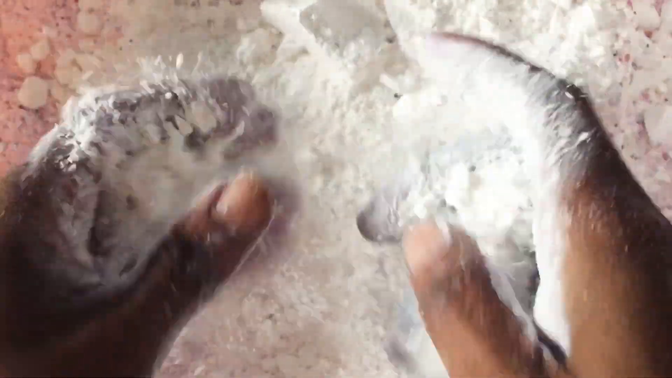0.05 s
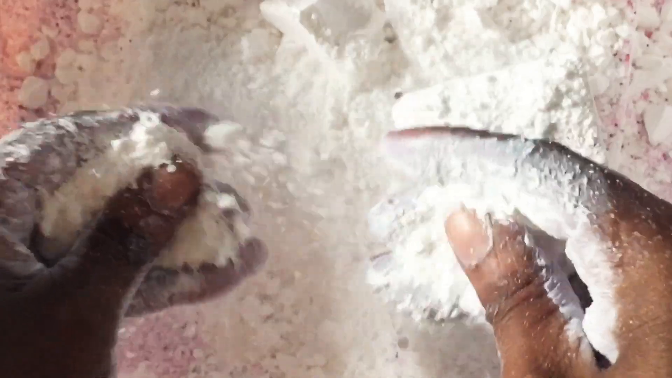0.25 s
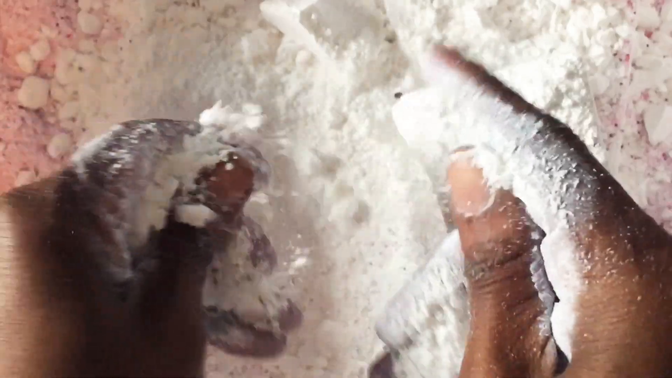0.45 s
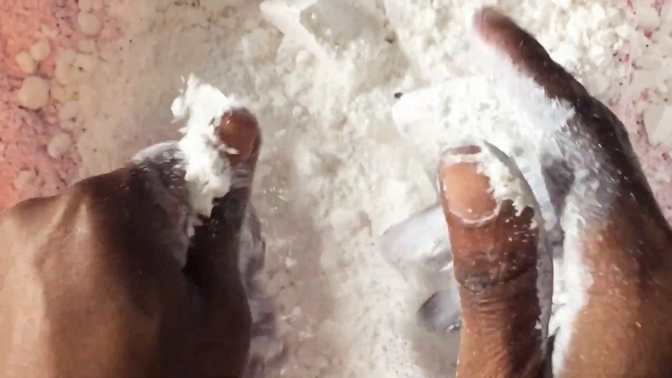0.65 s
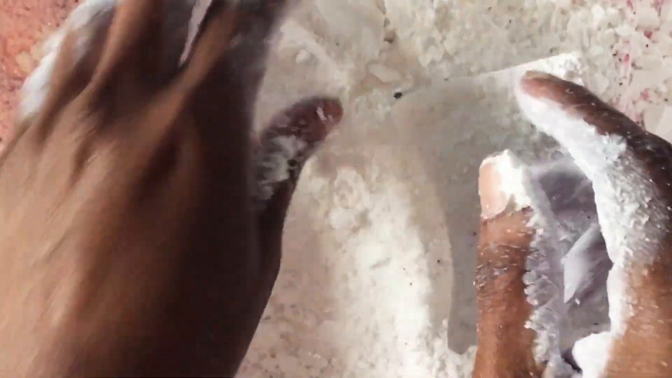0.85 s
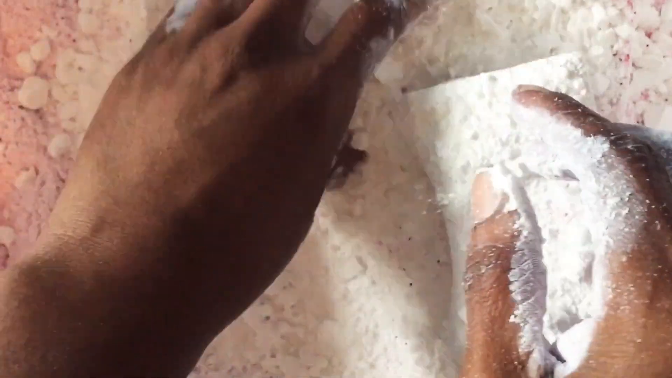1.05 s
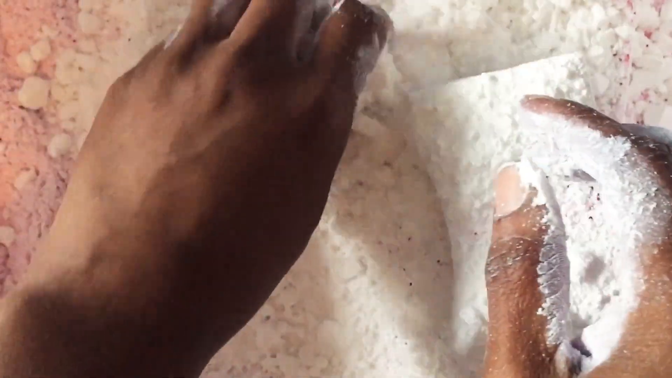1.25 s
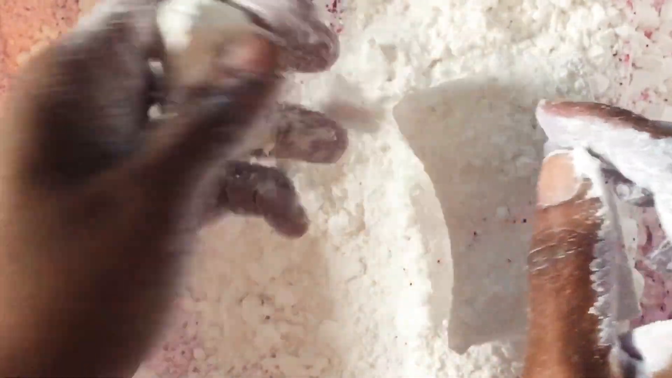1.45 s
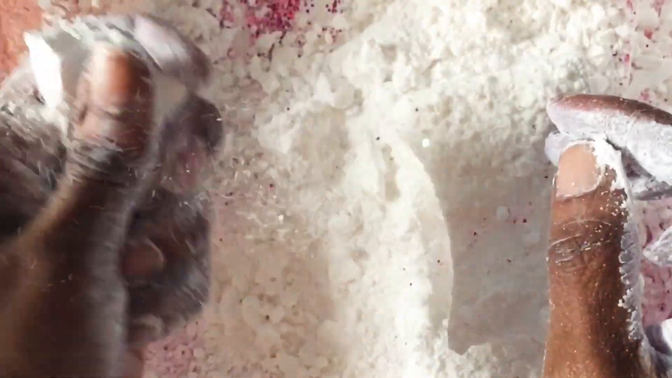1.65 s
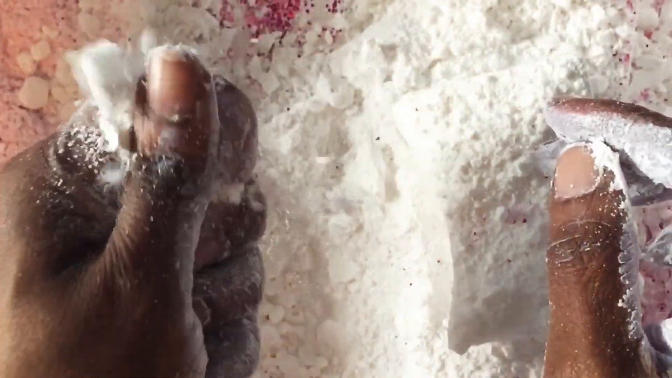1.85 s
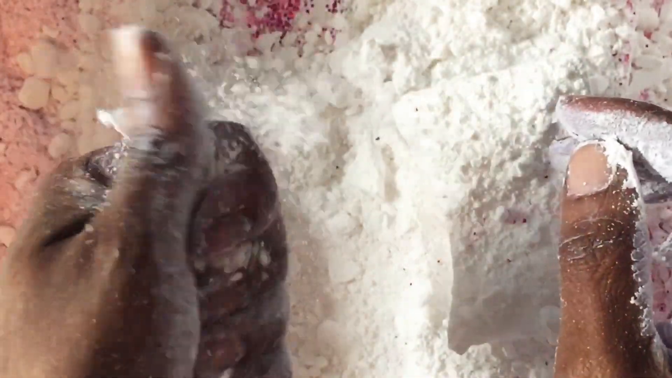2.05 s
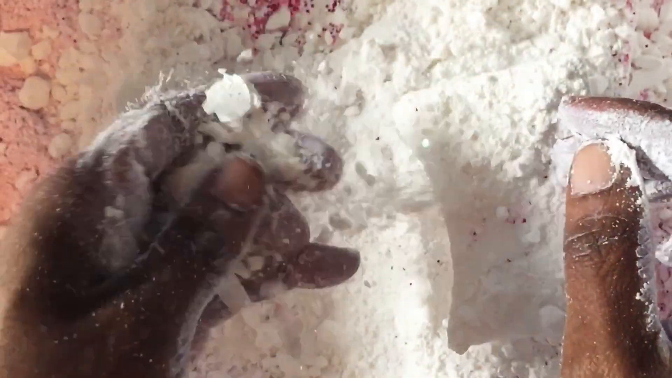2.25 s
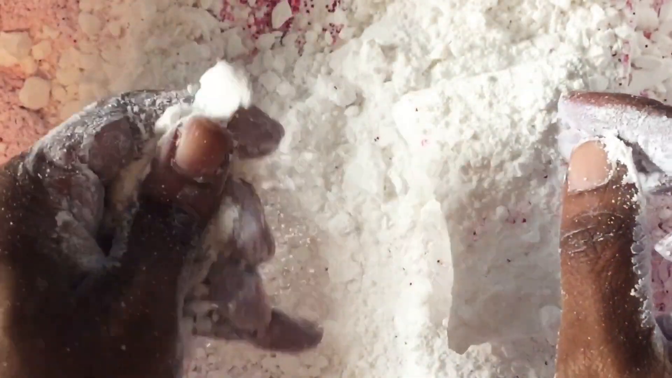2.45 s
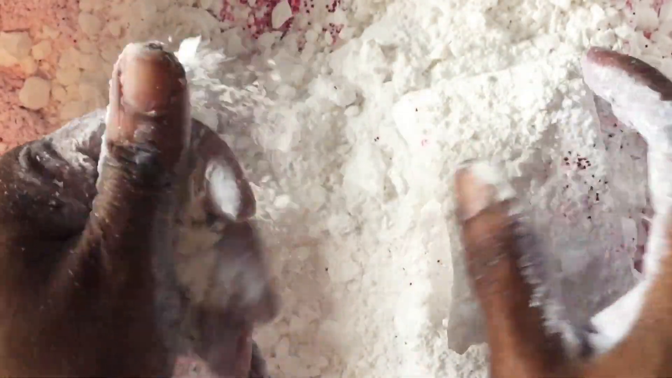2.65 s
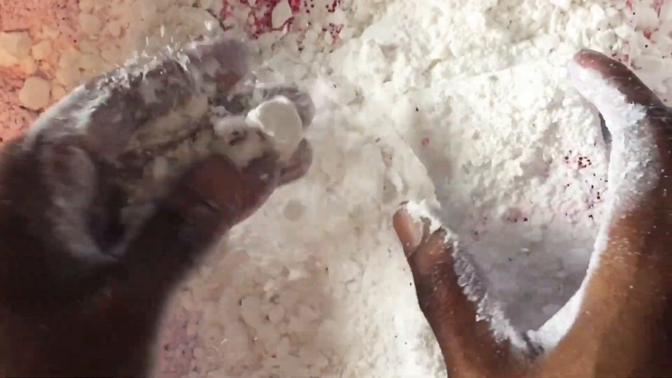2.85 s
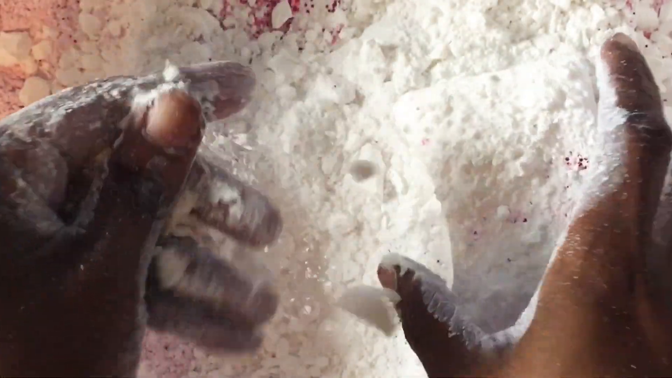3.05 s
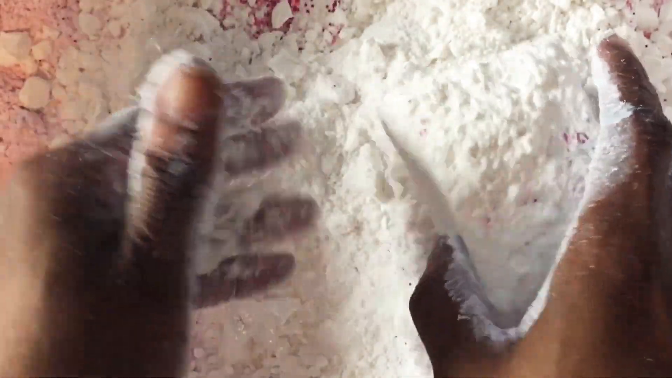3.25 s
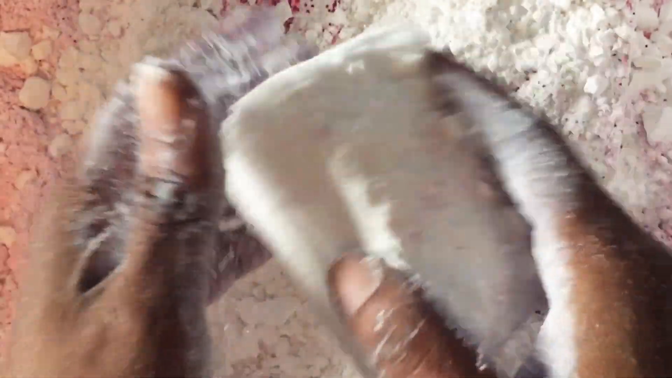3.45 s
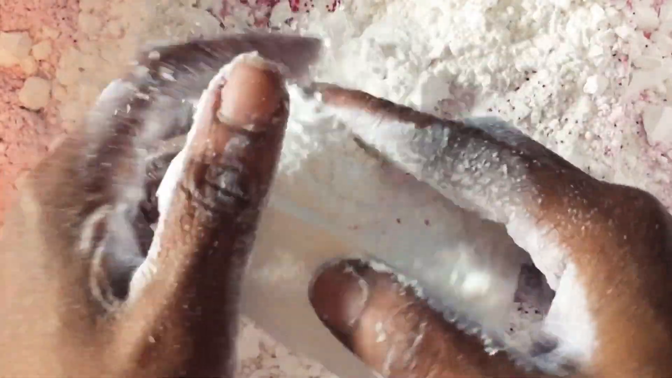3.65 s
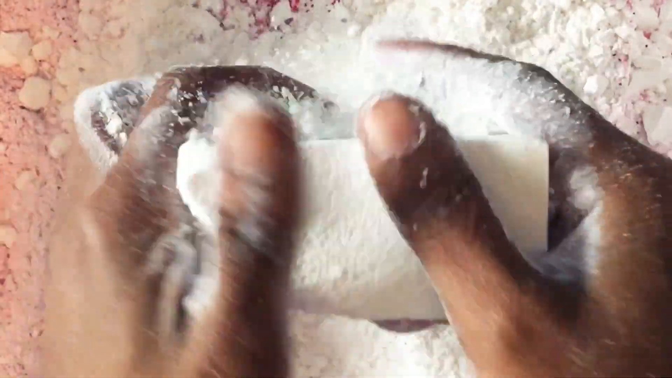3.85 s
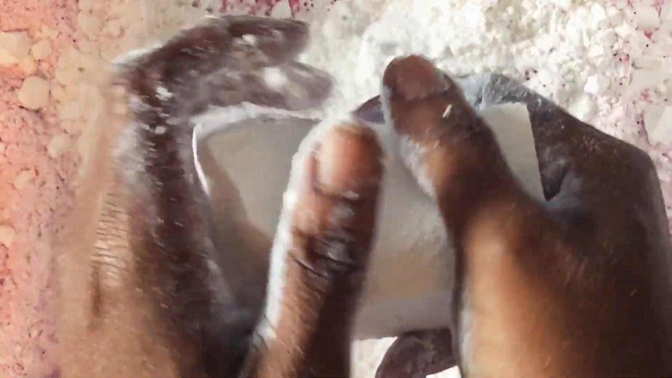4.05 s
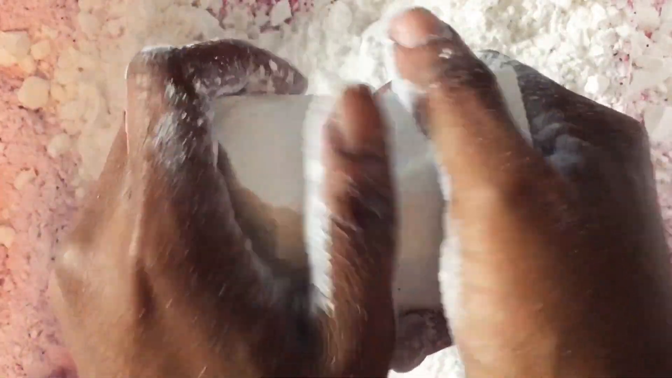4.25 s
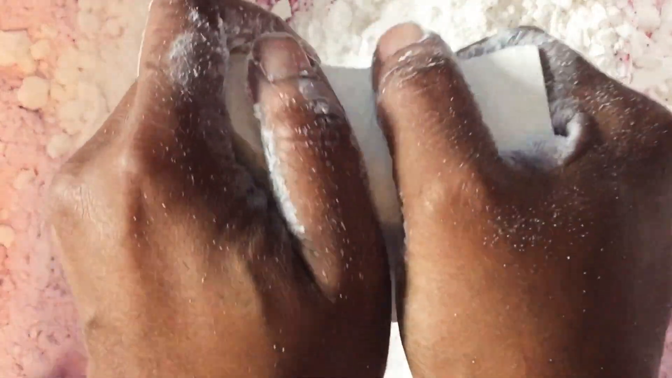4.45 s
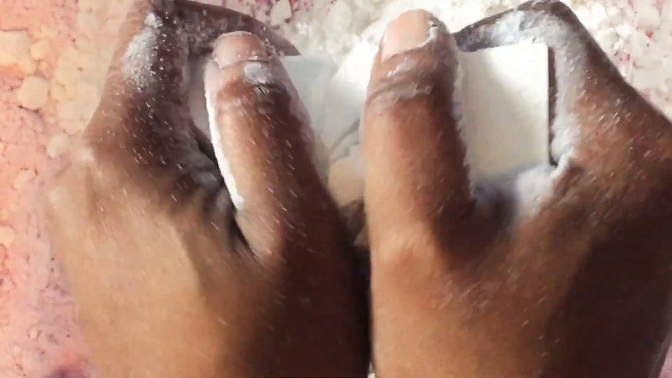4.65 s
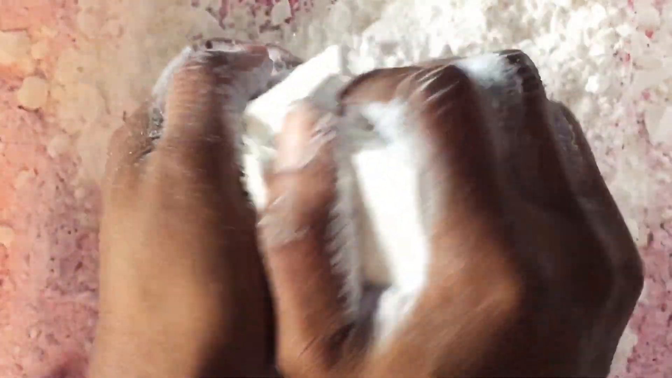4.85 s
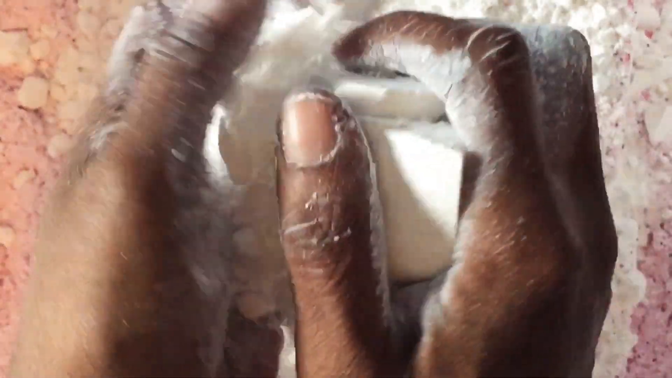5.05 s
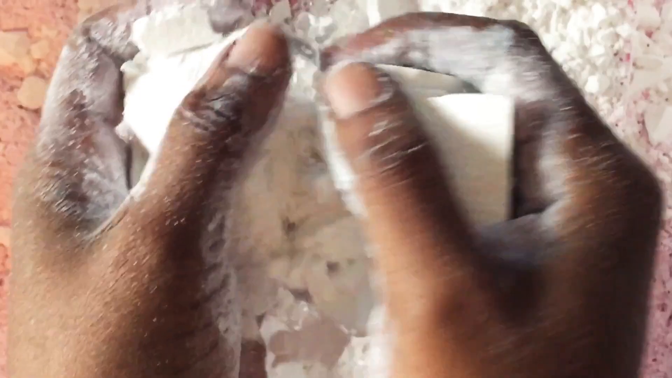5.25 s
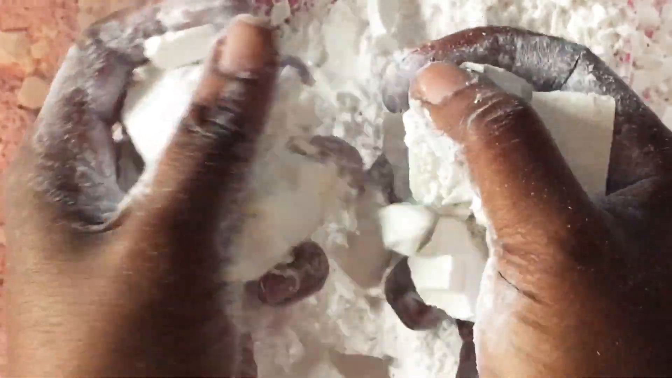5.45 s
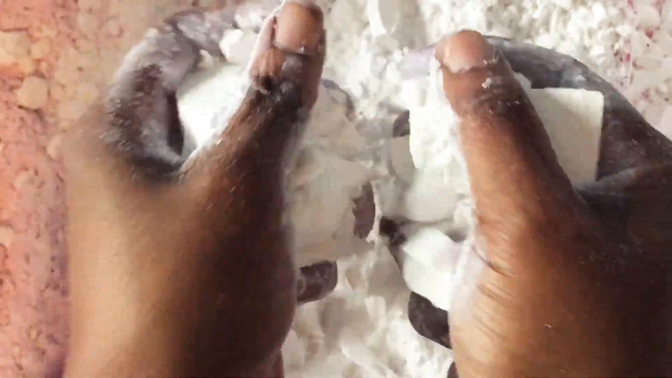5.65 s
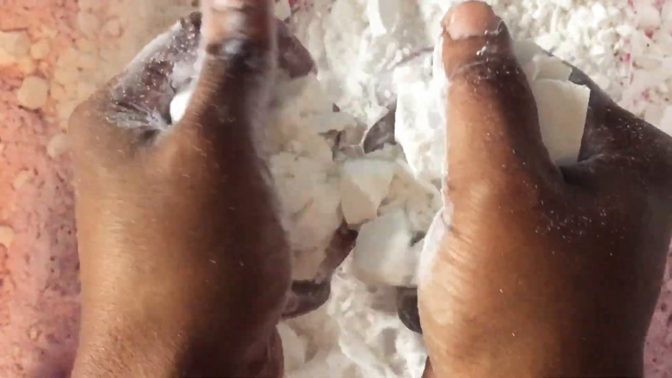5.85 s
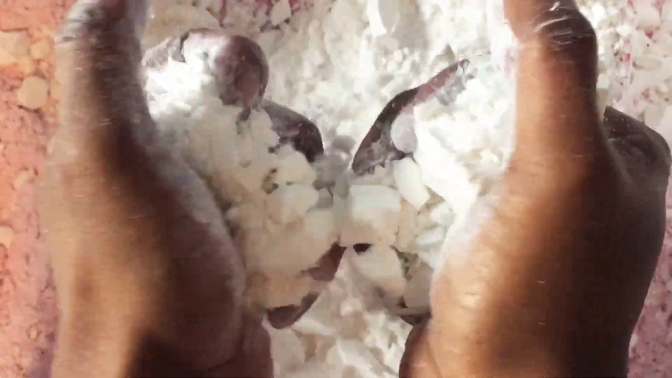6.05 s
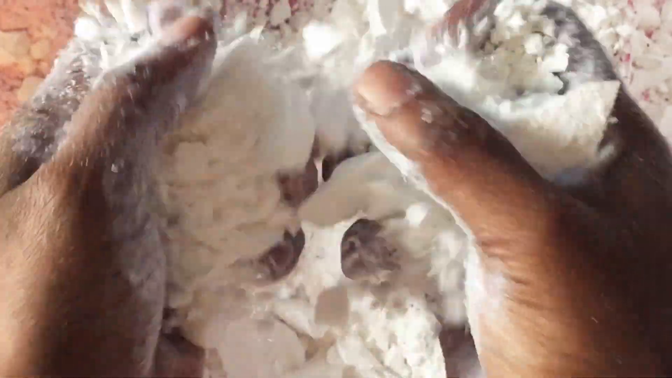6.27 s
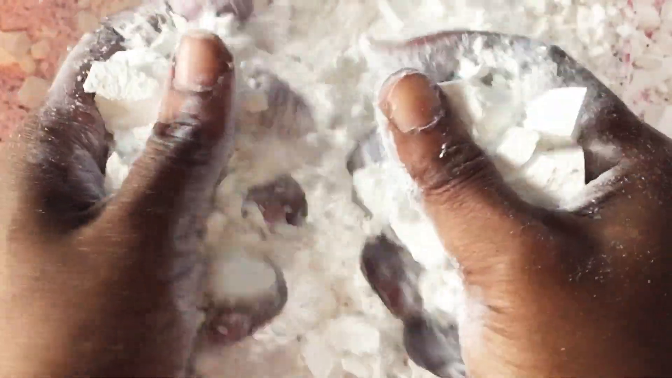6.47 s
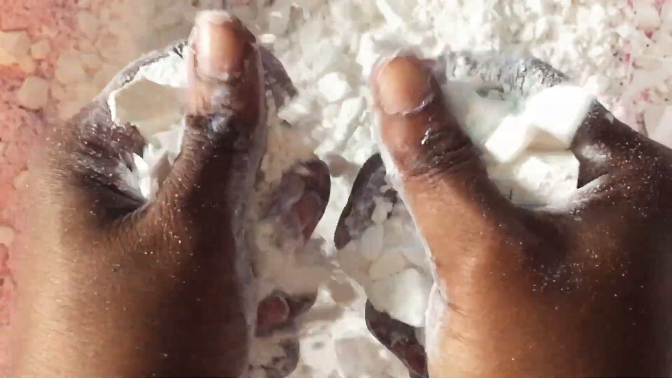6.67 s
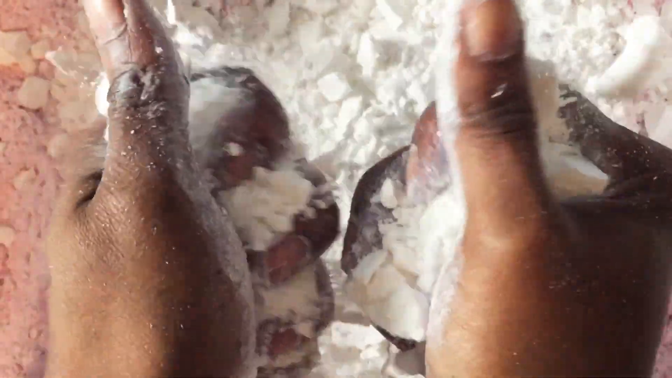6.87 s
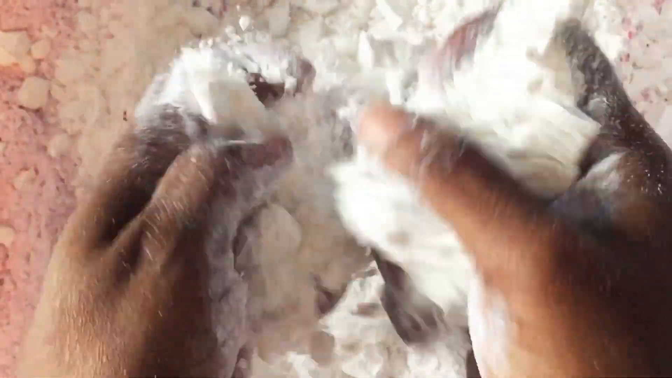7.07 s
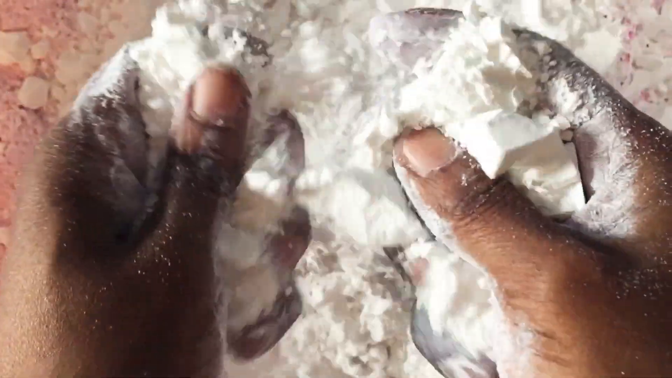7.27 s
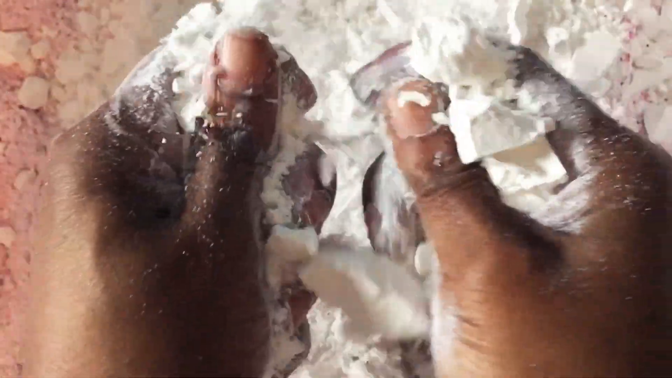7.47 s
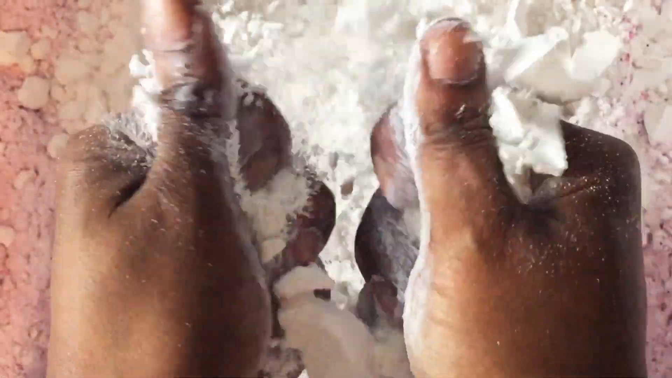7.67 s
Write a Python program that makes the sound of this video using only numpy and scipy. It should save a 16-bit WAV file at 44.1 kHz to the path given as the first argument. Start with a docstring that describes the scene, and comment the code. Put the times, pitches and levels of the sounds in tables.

```python
"""In a quiet room, close to a small microphone, two hands crush dry chalk blocks over a tray of powder.
Chunks snap as damped modes with bursts of splinter noise, and the tray thuds under them in modes of its own.
Crumbs grind and patter as random grains striking small modes, and powder hisses as filtered noise.
Fingers rub and squeak as noise through a moving resonance; the loaded tray wobbles and the room rumbles."""
import sys
import numpy as np
from scipy import signal
from scipy.fft import rfft, irfft
from scipy.io import wavfile
from scipy.ndimage import uniform_filter1d

SR = 44100
rng = np.random.default_rng(int(sys.argv[2]) if len(sys.argv) > 2 else 0)


def voltage_ratio(decibels):
    """Convert decibels (scalar or array-like) to amplitude ratios, 20 dB per decade."""
    exponent = np.asarray(decibels, float) / 20
    return 10 ** exponent


def persist_wave(psi):
    """Save psi, clipped to +-1, as 16-bit WAV."""
    counts = np.round(np.clip(psi, -1, 1) * 32767).astype(np.int16)
    wavfile.write(sys.argv[1], SR, np.atleast_2d(counts).T)


N = 339999  # length of the scene in samples

# clear fractures and knocks of chunks: (time [s], peak level [dB], pitch [Hz], splinter envelope peak [dB])
SNAPS = [(0.084, -38, 696, -47), (0.1173, -30.5, 1880, -43), (0.225, -31, 880, -41),
         (0.331, -26, 2040, -42.5), (0.598, -37.5, 650, -61.5), (0.628, -36, 975, -47),
         (0.665, -35, 590, -59), (0.8561, -36.5, 1540, -53), (0.895, -32, 1310, -50),
         (1.09, -55, 1500, -37), (1.155, -32, 2500, -43), (1.281, -43, 1500, -34.5),
         (1.587, -23, 1090, -36.5), (1.629, -21.5, 694, -25.5), (1.669, -19.5, 2290, -29.5),
         (1.6808, -21.5, 915, -26), (1.717, -33, 2900, -37), (1.7576, -14, 1390, -27.5),
         (1.838, -35.5, 1200, -40), (1.9099, -30, 850, -29.5), (1.978, -38.5, 1940, -57),
         (2.016, -39, 1800, -41.5), (2.072, -21.5, 550, -43), (2.112, -27, 900, -41),
         (2.165, -47, 2000, -54), (2.2339, -28.5, 684, -49), (2.275, -32, 596, -48.5),
         (2.359, -35.5, 1510, -42.5), (2.3802, -35, 780, -36.5), (2.419, -32.5, 2400, -52),
         (2.437, -29.5, 2630, -49), (2.459, -33.5, 1920, -45), (2.6676, -29.5, 750, -45),
         (3.0185, -27.5, 2940, -46), (3.1811, -34, 870, -47), (3.913, -30, 2430, -55),
         (3.923, -45, 2400, -38), (4.0022, -32, 1620, -55), (4.0785, -33, 1570, -47),
         (4.1766, -37.5, 1180, -61.5), (4.269, -31, 1120, -35), (4.28, -36, 1540, -38),
         (4.5331, -16.5, 640, -24.5), (4.5699, -12, 557, -21), (4.576, 4, 1980, -10), (4.585, -9, 920, -22),
         (4.5894, -2.5, 1310, -16), (4.5938, -14, 885, -18), (4.5963, -9, 1870, -20),
         (4.6139, -8.5, 1400, -23.5), (4.7502, -23, 1090, -32), (4.768, -24, 1390, -44),
         (4.789, -12, 1480, -19), (4.89, -28, 1560, -28), (4.903, -22.5, 1340, -26.5),
         (4.9295, -25.5, 1450, -37), (4.974, -40, 1300, -36), (5.001, -30, 2530, -35),
         (5.068, -29, 1070, -32.5), (5.1308, -48, 2830, -31), (5.246, -25, 1740, -33),
         (5.3934, -19.5, 870, -54), (5.419, -38, 810, -24.5), (5.425, -31, 1500, -32),
         (5.456, -27, 790, -37), (5.4936, -26, 1010, -49.5), (5.56, -13.5, 705, -42),
         (5.6093, -21, 510, -53), (5.6164, -17.5, 825, -27.5), (5.6421, -16.5, 590, -30),
         (5.65, -14.5, 1840, -25), (5.654, -10, 1080, -21), (5.6674, -15, 1520, -28),
         (5.6765, -12, 1520, -22.5), (5.711, -14, 1070, -24.5), (5.716, -15.5, 1420, -25.5),
         (5.739, -14, 1340, -28.5), (5.754, -16, 780, -34), (5.7738, -20, 930, -27),
         (5.8366, -22.5, 920, -30.5), (5.874, -14.5, 1320, -30), (5.8882, -16.5, 940, -36),
         (5.936, -25, 1270, -29), (6.0054, -13.5, 1190, -31), (6.0367, -11, 760, -24),
         (6.106, -13, 830, -20), (6.2719, -16.5, 1460, -26), (6.337, -35, 2020, -32.5),
         (6.3811, -14, 2210, -38.5), (6.3963, -22, 1470, -30), (6.4464, -19, 1190, -27.5),
         (6.485, -17, 1600, -29), (6.5292, -18.5, 1520, -31), (6.5357, -15.5, 970, -42),
         (6.6398, -24.5, 870, -34.5), (6.6564, -21, 720, -31), (6.7492, -14.5, 970, -31),
         (6.7573, -14.5, 1290, -27), (6.8417, -38, 1660, -31), (6.8735, -35, 810, -30),
         (6.9007, -27, 695, -33.5), (6.938, -23.5, 2200, -31), (7.017, -13, 1090, -38),
         (7.274, -13.5, 816, -50), (7.295, -33, 2000, -45), (7.3454, -7, 862, -53), (7.3496, -17, 252, -52),
         (7.4447, -16, 442, -24.5), (7.453, -22.5, 800, -36), (7.5227, -27.5, 1180, -42),
         (7.5886, -25.5, 1390, -33), (7.673, -28.5, 1200, -56)]
# modes of the tray, levels relative to the thud:
# (frequency [Hz], level under a crisp snap [dB], level under a soft knock [dB], t60 [s])
TRAY_MODES = [(137, -25, -6, 0.066), (211, -13.5, -11.5, 0.053), (279, -2, 4.5, 0.014),
              (420, 6, -0.5, 0.011)]
# squeezes and rubs of the hands:
# (start [s], length [s], effort level at mid-stroke [dB], swell over the stroke [dB], dust above crumbs [dB])
STROKES = [(0.0, 0.39, -54, 4, -6), (0.534, 0.26, -57.5, -0.5, -3.5), (0.855, 0.073, -53.5, -2, -9),
           (1.042, 0.23, -48.5, 13.5, -11.5), (1.353, 0.09, -56.5, 7, -5.5), (1.568, 0.36, -53, -4, -6.5),
           (2.08, 0.17, -55.5, -14, -9), (2.272, 0.48, -57.5, 1.5, -5), (2.86, 0.42, -58, 3.5, -4.5),
           (3.377, 0.21, -60.5, 2.5, -2), (3.658, 0.34, -59.5, 3.5, 2), (4.125, 0.043, -63, 0, 6),
           (4.277, 0.15, -52.5, -4.5, -0.5), (4.613, 0.0055, -33, -5, -11), (4.754, 0.058, -40, -3.5, -6.5),
           (4.865, 0.48, -46, 2, -5), (5.401, 0.087, -43, -4, -3), (5.573, 0.048, -37, 7.5, -9.5),
           (5.648, 0.51, -43, -5, -8), (6.203, 0.35, -43.5, 9.5, -7), (6.505, 0.44, -46.5, -7, -5.5),
           (7.013, 0.15, -47.5, 1, -9.5), (7.246, 0.2, -42, 1, -11), (7.447, 0.47, -48, 3, -5.5)]
# spectrum of crumbs and debris: (frequency [Hz], relative level [dB])
CRUMB_SPECTRUM = [(130, -54), (250, -5.5), (500, -0.5), (1000, -1), (1700, -6), (2600, -3), (3600, -11),
                  (6000, -63)]
# spectrum of powder and splinters: (frequency [Hz], relative level [dB])
POWDER_SPECTRUM = [(2400, -11.5), (3700, -5), (4800, -0.5), (7000, -4.5), (11000, -14), (16000, -22)]
# spectral tilts of the ticks, from dull to bright, dealt to the grains at random:
# (level at the top of the band [dB])
TICK_TILTS_DB = [-14, -4, 9]
# fingers sliding over chalk and powder:
# (start [s], length [s], resonance [Hz], bandwidth of each pole [Hz], level before shaping [dB])
RUBS = [(0.197, 0.29, 2600, 900, -63), (0.503, 0.26, 2600, 695, -61), (0.817, 0.0091, 6060, 250, -44),
        (1.034, 0.106, 794, 2370, -50.5), (1.131, 0.19, 595, 2200, -45), (1.122, 0.186, 6000, 11000, -58.5),
        (1.388, 0.083, 7850, 2500, -62.5), (2.478, 0.3, 2670, 650, -66), (3.417, 0.19, 2250, 800, -65),
        (3.662, 0.32, 2730, 700, -66), (3.634, 0.4, 7700, 10900, -57.5), (3.869, 0.058, 5500, 280, -46.5),
        (5.128, .012, 3250, 250, -33.5), (5.171, 0.03, 3200, 200, -42), (5.215, 0.014, 3215, 220, -29.5)]
# the hands lean on the tray: (start [s], length [s], load level [dB])
LEANS = [(0.23, 0.033, -50.5), (1.063, 0.037, -38.5), (1.147, 0.15, -39.5), (2.05, 0.5, -51.5),
         (2.885, 0.64, -57), (4.265, 0.14, -55.5), (4.56, 0.083, -38.5), (4.748, 0.021, -44.5),
         (5.252, 0.22, -47), (6.357, 0.42, -44), (7.012, 0.22, -46.5), (7.273, 0.12, -39.5),
         (7.45, .3, -50.5)]
# heavy pushes that set the whole tray bouncing: (time [s], level [dB])
BOUNCES = [(1.168, -26), (5.607, -20)]
# spectrum of the room: (frequency [Hz], relative level [dB])
RUMBLE_SPECTRUM = [(5, -9.5), (14, 9.5), (36, -12.5), (52, 0), (70, -14.5), (125, -14.5), (300, -26),
                   (2000, -43), (16000, -53.5)]

# the thud grows more than in proportion to the snap (dB per dB), and is larger for big (low) chunks
THUD_DB, THUD_GROWTH, THUD_DB_PER_OCTAVE = -1, 1.34, -9
TRAY_RISE_S = 0.001  # time constant: the tray takes up a blow through the powder
GRIP_DB_PER_S, LET_GO_DB_PER_S = 457, 264  # how fast a stroke sets in and dies away
GRAINS_PER_S = 400  # before clumping
BITE = 0.3  # exponent: ticks stand further out of the dust as the hands press harder
IDLE_CRUMB_DB, IDLE_DUST_DB, IDLE_TRAY_DB = -102, -72, -71  # the trickle between strokes and leans
GAP_CLOSES_PER_S, GAP_WANDER = 0.39, 0.063  # climb and rms drift of a wide rub, as shares of its pitch
SQUEAK_FADE_DB = 17
BOUNCE_HZ, BOUNCE_T60_S = 102.6, 0.17
RUMBLE_DB = -43.5


def noise():
    """White noise: independent Gaussian samples, equal power at all frequencies."""
    return rng.standard_normal(N)


def unit(x):
    """Normalization: scales a signal to rms 1."""
    return x / np.sqrt(np.mean(x ** 2) + 1e-20)


def coloured(x, points):
    """Linear filtering: weights the spectrum by a curve through (Hz, dB) points, then sets rms 1."""
    f, db = np.transpose(points)
    hz = np.fft.rfftfreq(len(x), 1 / SR)
    gain = voltage_ratio(np.interp(np.log(hz + 1), np.log(f), db))
    return unit(irfft(rfft(x) * gain, len(x)))


def ring(hz, t60, size=1500):
    """Damped free vibration: a struck mode decays exponentially from height 1."""
    t = np.arange(size) / SR
    return np.sin(2 * np.pi * hz * t) * voltage_ratio(-60 * t / t60)


def patchy(x, depth_db):
    """Spectral fluctuation: the colour shifts in patches about 2 kHz wide and 15 ms long."""
    z = signal.stft(x, nperseg=256)[2]
    field = uniform_filter1d(rng.standard_normal(z.shape), size=12, axis=0)
    field = uniform_filter1d(field, size=5, axis=1)
    return signal.istft(z * voltage_ratio(depth_db * unit(field)), nperseg=256)[1][:len(x)]


def add(mix, s, sound):
    """Superposition: adds a sound to the mix, in place, at s seconds."""
    part = mix[round(s * SR):][:len(sound)]
    part += sound[:len(part)]


def stroke(start, length, db, swell_db=0):
    """Power envelope of one stroke: quick onset, hold with a steady swell, slower release."""
    t = np.arange(0, N, 64) / SR - start
    hold_db = db + swell_db * (np.clip(t / length, 0, 1) - 0.5)
    onset_db = GRIP_DB_PER_S * np.minimum(t, 0)
    release_db = -LET_GO_DB_PER_S * np.maximum(t - length, 0)
    return voltage_ratio(hold_db + onset_db + release_db) ** 2


def work(powers, idle_db):
    """Incoherent addition: strokes add their power over an idle trickle; a gain for every sample."""
    gain = np.sqrt(sum(powers) + voltage_ratio(idle_db) ** 2)
    return np.interp(np.arange(N), np.arange(0, N, 64), gain)


def snaps():
    """Brittle fracture: damped modes, a splinter burst and crunch; soft knocks ring longer; the tray thuds."""
    out, t = np.zeros(N), np.arange(1500) / SR
    cushion = 1 - np.exp(-np.arange(4000) / SR / TRAY_RISE_S)
    splinters, debris = coloured(noise(), POWDER_SPECTRUM), coloured(noise(), CRUMB_SPECTRUM)
    for s, db, hz, splinter_db in SNAPS:
        mode_luck, crack_luck = rng.random(2)
        here = slice(round(s * SR), round(s * SR) + 1500)
        soft = db - splinter_db > 24
        if soft:  # soft contact, two low modes
            body = ring(hz, 13 / hz) + ring(0.55 * hz, 4.6 / hz)
            body *= 1 - np.exp(-t * hz * 6)
        else:
            body = ring(hz, 4.2 / hz) - 0.4 * ring(hz * (1.7 + mode_luck), 0.003)
            body *= 1 - np.exp(-t * hz * 4)
        add(out, s, voltage_ratio(db) * body / abs(body).max())

        # the crack bursts out at once, its length differs from piece to piece, and dust sprays after it
        crack = voltage_ratio(-60 * t / (0.004 + 0.007 * crack_luck))
        spray = 0.07 * voltage_ratio(-60 * t / 0.045)
        burst = (1 - np.exp(-t / 0.00012)) ** 2 * (crack + spray)
        grit = uniform_filter1d(splinters[here], size=4 if soft else 2)
        add(out, s, voltage_ratio(splinter_db) / burst.max() * burst * grit)

        crunch = np.sqrt(t / 0.0016) * voltage_ratio(-60 * t / (0.045 if soft else 0.02))
        add(out, s, voltage_ratio(db - 15.5) * crunch * uniform_filter1d(debris[here], size=20 if soft else 1))

        thud_db = THUD_DB + THUD_GROWTH * db + THUD_DB_PER_OCTAVE * np.log2(hz / 800)
        for mode_hz, crisp_db, soft_db, t60 in TRAY_MODES:
            level = voltage_ratio(thud_db + (soft_db if soft else crisp_db))
            add(out, s, -level * ring(mode_hz, t60, size=4000) * cushion)
    return out


def crumble():
    """Shot noise: grains give way in clumps, few large among many small; each knocks dully and puffs powder."""
    clump = voltage_ratio(3.5 * unit(uniform_filter1d(noise(), size=900)))
    breaks = rng.random(N) < GRAINS_PER_S * clump / SR
    size = voltage_ratio(4.6 * np.minimum(rng.exponential(1, N), 3.6)) * breaks
    shape, knocks = rng.integers(0, 24, N), np.zeros(N)
    for k, hz in enumerate(np.geomspace(250, 3200, num=24)):
        knocks += signal.oaconvolve(size * (shape == k), ring(hz, 9.7 / hz) * np.sqrt(hz))[:N]

    t = np.arange(800) / SR
    puff = (1 - np.exp(-t / 0.0001)) * voltage_ratio(-60 * t / 0.004)  # bursts out, then settles
    puffs = unit(signal.oaconvolve(size, puff)[:N])
    ticks = np.zeros(N)
    for k, db in enumerate(TICK_TILTS_DB):
        envelope = signal.oaconvolve(size * (shape % len(TICK_TILTS_DB) == k), puff)[:N]
        ticks += envelope * coloured(noise(), [(2000, -db), (SR / 2, db)])
    ticks = unit(ticks)

    friction = (0.68 + 0.33 * puffs) * clump ** 0.3 * noise()
    grind = coloured(0.58 * unit(knocks) + friction, CRUMB_SPECTRUM)
    crumbs = work([stroke(*row[:4]) for row in STROKES], IDLE_CRUMB_DB)
    dust = work([stroke(*row[:4]) * voltage_ratio(row[4]) ** 2 for row in STROKES], IDLE_DUST_DB)
    bite = 0.6 * (crumbs / np.median(crumbs)) ** BITE
    hiss = clump ** 0.3 * (0.68 * patchy(noise(), 3.5) + bite * ticks)
    return crumbs * grind + dust * coloured(hiss, POWDER_SPECTRUM)


def rubs():
    """Friction noise excites the moving resonance of the gap between skin and chalk; narrow ones squeak."""
    out, t = np.zeros(N), np.arange(-2000, 18000) / SR  # the first 2000 samples let the filter settle
    for s, length, hz, width, db in RUBS:
        grit, bumps, drift = rng.standard_normal((3, len(t)))
        grit = signal.lfilter([1, -1], [1, -0.96], grit)
        grit *= voltage_ratio(3.4 * unit(uniform_filter1d(bumps, size=500)))
        climb = GAP_CLOSES_PER_S * (t - length / 2)
        wander = GAP_WANDER * unit(uniform_filter1d(drift, size=3000))
        pitch = hz * (1 + (width > 300) * (climb + wander))

        # three equal poles at zero frequency, shifted up to the moving pitch
        r = np.exp(-np.pi * width / SR)
        turn = np.exp(2j * np.pi * np.cumsum(pitch) / SR)
        tuned = (turn * signal.lfilter([1], np.poly([r, r, r]), grit / turn)).real

        # a squeak starts quickly with a scratch and fades
        n = round(length * SR)
        squeak = width < 300
        fade = voltage_ratio(-squeak * SQUEAK_FADE_DB * np.arange(n) / n)
        shape = signal.windows.tukey(n, 0.06 if squeak else 0.25) * fade
        scratch = squeak * 0.44 * shape * grit[2000:2000 + n]
        add(out, s, voltage_ratio(db) * shape * (unit(tuned[2000:2000 + n]) + scratch))
    return out


def tray():
    """Forced and free vibration: the loaded tray wobbles, strongest near 85 Hz, and bounces when pushed hard."""
    load = work([stroke(*row) for row in LEANS], IDLE_TRAY_DB)
    wobble = [(45, -18), (85, 2.5), (120, -4.5), (170, -6.5), (500, -26), (2500, -85)]  # (Hz, dB)
    out = load * coloured(noise(), wobble)
    for s, db in BOUNCES:
        add(out, s, -voltage_ratio(db) * ring(BOUNCE_HZ, BOUNCE_T60_S, size=8000))
    return out


def room():
    """Stationary background noise: low rumble of the building and faint hiss."""
    return voltage_ratio(RUMBLE_DB) * coloured(noise(), RUMBLE_SPECTRUM)


def scene():
    """Superposition of the chalk, hands and tray over the room, in one channel."""
    return (snaps() + crumble() + rubs() + tray() + room())[None]


def top_cut(x):
    """Nothing passes above the cut-off."""
    return signal.sosfilt(signal.butter(12, 15950, fs=SR, output="sos"), x)


def record(dry):
    """Band limiting and saturation: the top edge is filtered off, then the converter clips at full scale."""
    low_pass = signal.cheby2(12, 50, 16700, fs=SR, output="sos")
    mix = np.clip(signal.sosfilt(low_pass, dry), -1, 1)
    return top_cut(mix)


dry = scene()
out = record(dry)
persist_wave(out)
```